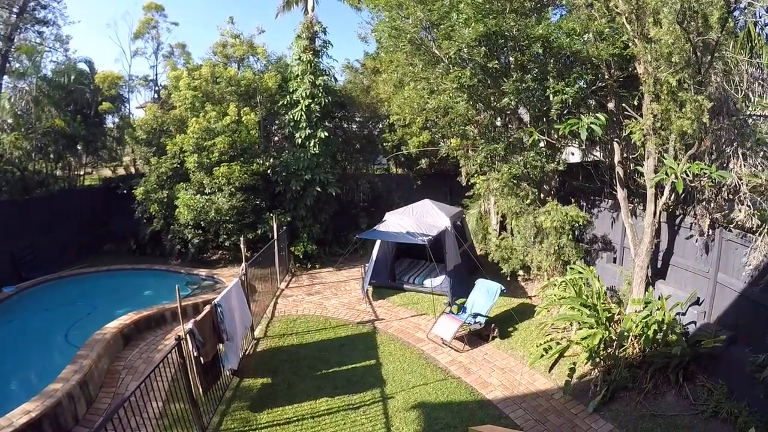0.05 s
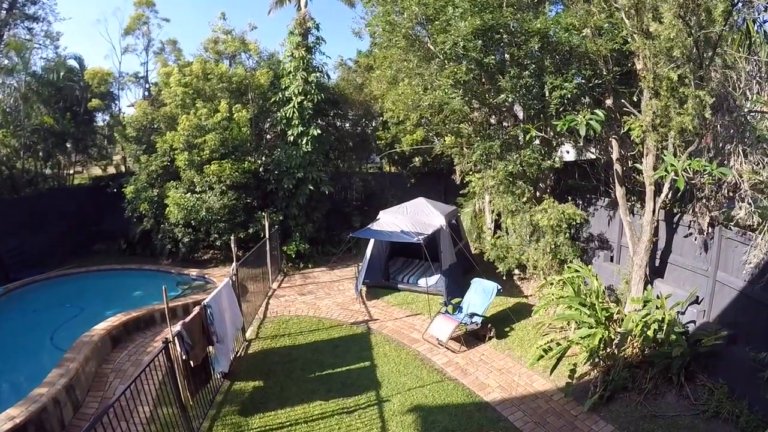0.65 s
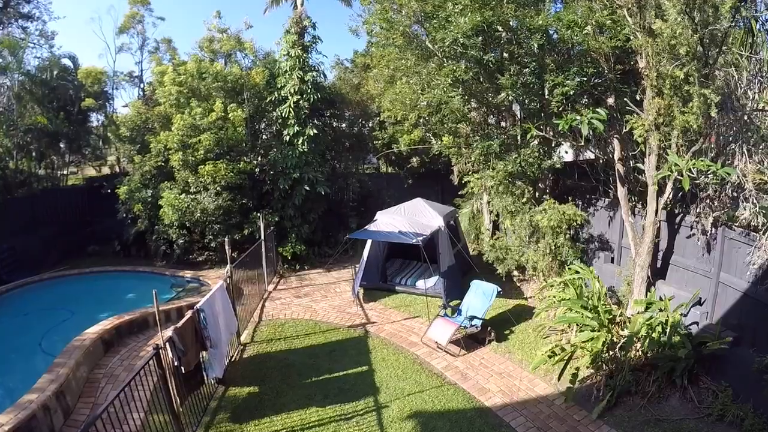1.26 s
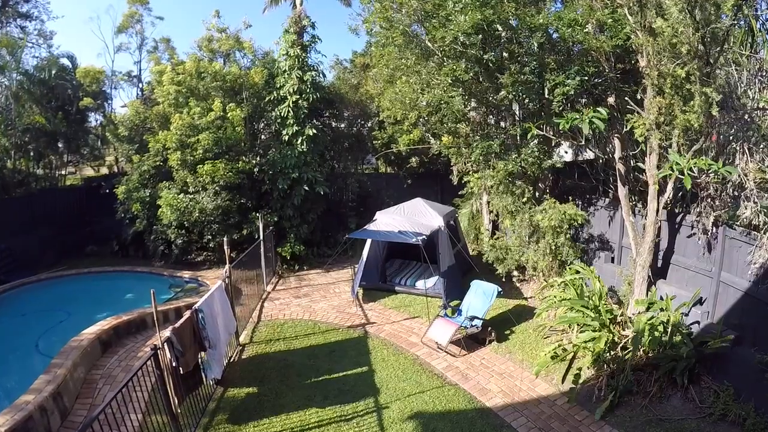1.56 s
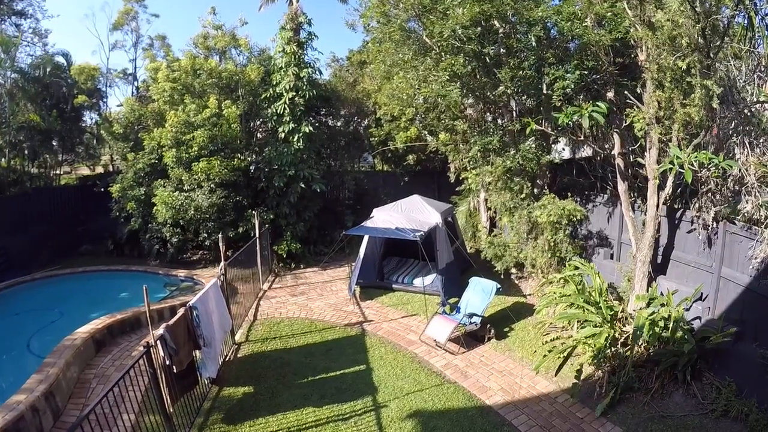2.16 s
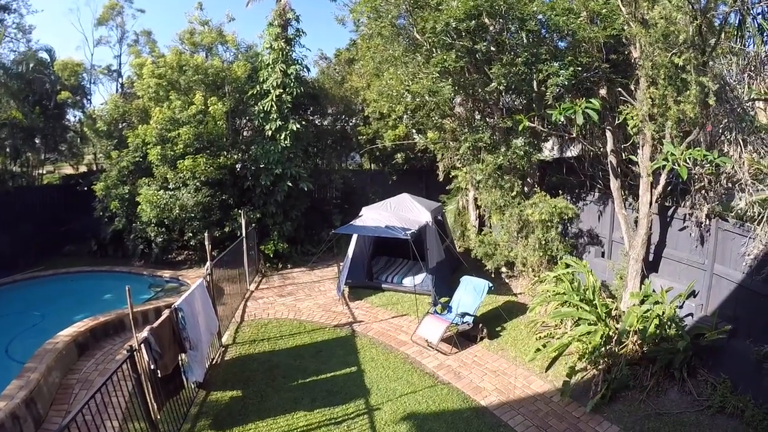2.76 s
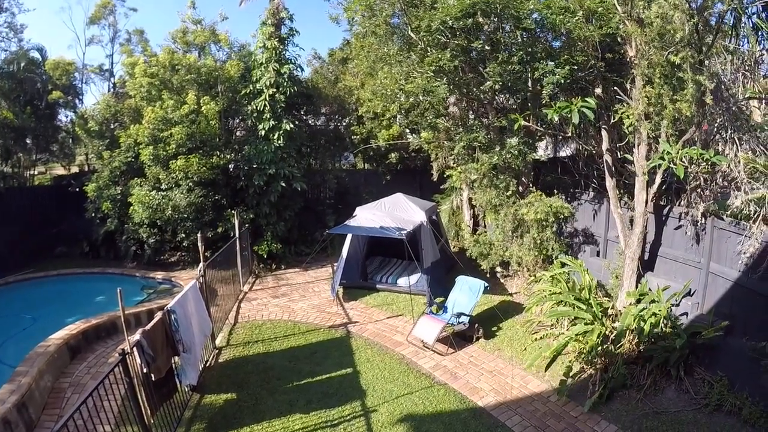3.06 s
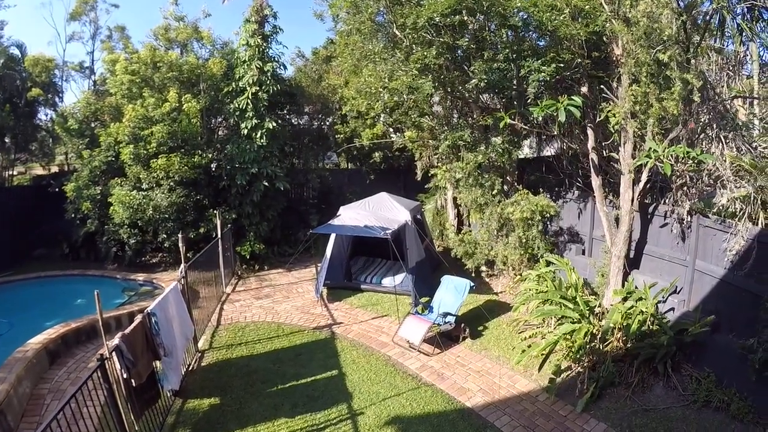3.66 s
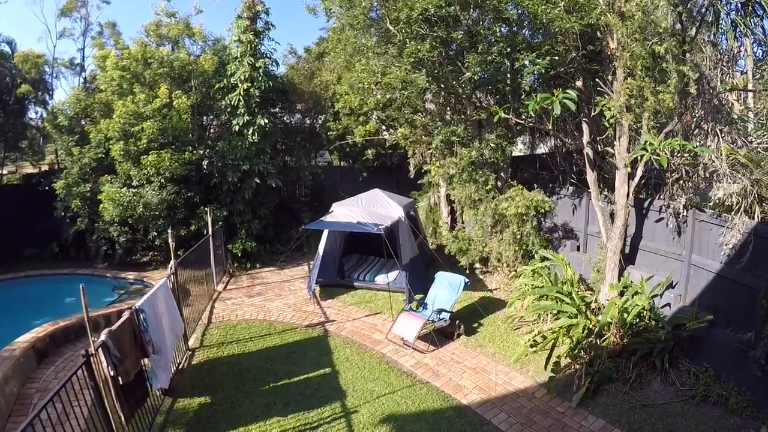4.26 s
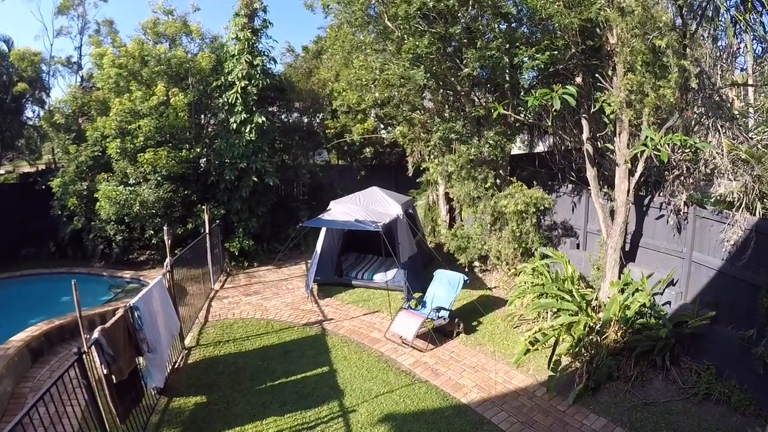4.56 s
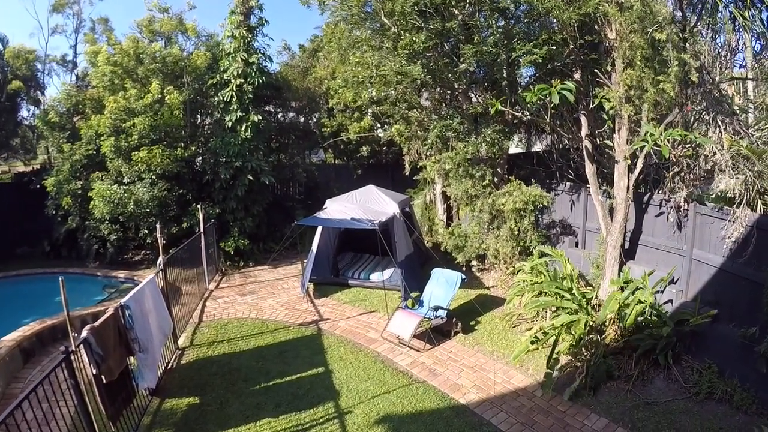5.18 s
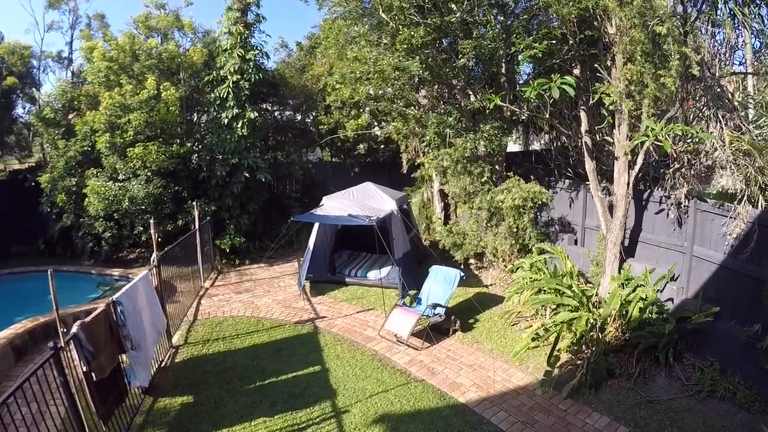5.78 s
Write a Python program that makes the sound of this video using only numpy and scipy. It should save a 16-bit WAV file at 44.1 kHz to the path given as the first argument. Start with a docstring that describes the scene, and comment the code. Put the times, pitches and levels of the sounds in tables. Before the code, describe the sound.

A small bird repeats short rising chirps in a garden while wind gusts thump the microphone over rustling leaves and a low hum.

```python
"""A bird in a breezy garden

A small bird repeats a short rising chirp that echoes off fence and house; far birds whistle faintly.
Gusts of wind thump the hand-held microphone, and fingers brush its case. Behind it all, leaves hiss,
distant traffic roars, an engine drones and a pool pump hums."""
import sys
import numpy as np
from scipy import signal
from scipy.fft import rfft, irfft
from scipy.io import wavfile
from scipy.ndimage import uniform_filter1d

SR = 44100
rng = np.random.default_rng(int(sys.argv[2]) if len(sys.argv) > 2 else 0)


def int16_out(signal):
    """Quantize to a 16-bit WAV file."""
    q = np.round(np.clip(np.atleast_2d(signal).T, -1, 1) * 32767)
    wavfile.write(sys.argv[1], SR, q.astype(np.int16))


N = 256662
T = np.arange(N) / SR

# one row a chirp (time of the top [s], top pitch [Hz], level [dB], overtone boost [dB])
CHIRP_NOTES = [(1.076, 2840, -52.5, -3), (2.943, 2980, -50, 1), (3.856, 2880, -51.5, -0.5),
               (4.404, 3026, -48.5, 1), (5.1, 3046, -47, 4), (5.724, 3070, -46, 1.5)]
# what the throat and beak let through (frequency [Hz], level [dB])
BEAK_TONE = [(2000, 2.5), (2700, -4), (3100, 4), (4200, -11), (4800, -1.5), (5500, -1.5), (6100, 0.5),
             (6700, -16), (8100, -14), (9000, -31), (14000, -37)]


def chirps(rise_s=0.039, droop_s=0.0077, fade_s=0.015, onset_db=-14.5, jitter=0.013):
    """A whistle sweeps up as it swells, then droops as it fades; the beak colours its overtones."""
    out = np.zeros(N)
    t = np.arange(-rise_s, droop_s, 1 / SR)  # 0 is the top of the sweep
    before, after = np.maximum(-t, 0), np.maximum(t, 0)
    sweep = 2 ** (-14 * before - 11 * after)  # 14 octaves a second up, 11 down
    swell = gain_of(onset_db * (before / rise_s) ** 2)
    swell *= np.minimum((droop_s - t) / fade_s, 1) * signal.windows.tukey(len(t), .1)
    for start, top_hz, db, bright_db in CHIRP_NOTES:
        waver = evened(uniform_filter1d(rng.standard_normal(SR // 4), 90))[:len(t)]
        hz = top_hz * sweep * (1 + jitter * waver)
        phase = phase_of(hz)
        voice = sum(gain_of(read(BEAK_TONE, k * hz) + bright_db * (k > 1)) * np.sin(k * phase)
                    for k in range(1, 6))
        add(out, start - rise_s, gain_of(db) * swell * voice)
    return out


# far birds' calls (time [s], length [s], start pitch [Hz], end pitch [Hz], level [dB])
FAR_CALLS = [(0.966, 0.06, 1960, 1926, -61.5), (1.231, 0.069, 1230, 1290, -59),
             (3.393, 0.17, 4780, 4790, -64.5), (3.44, 0.12, 2415, 2370, -65.5),
             (3.57, 0.11, 4500, 4045, -65), (3.619, 0.107, 2026, 1790, -63),
             (4.15, 0.077, 2096, 2285, -58.5), (4.191, 0.096, 2884, 2950, -62)]


def far_birds(jitter=0.012):
    """Birds in far trees whistle soft, sliding notes with a shaky pitch."""
    out = np.zeros(N)
    quaver = 1 + jitter * drift(120)
    for start, length, start_hz, end_hz, db in FAR_CALLS:
        hz = np.linspace(start_hz, end_hz, int(length * SR))
        hz *= quaver[round(start * SR):][:len(hz)]
        add(out, start, gain_of(db) * np.sin(phase_of(hz)) * signal.windows.tukey(len(hz), .5))
    return out


# echoes off the fence and house (delay [s], level [dB])
WALL_ECHOES = [(0.013, -22), (0.027, -10)]


def garden(sound, foliage_db, tail_db):
    """A call arrives directly, then blurred by leaves, bounced off walls and as a fading tail."""
    response = gain_of(foliage_db) * scatter(fade_s=0.067) + gain_of(tail_db) * scatter(fade_s=0.56)
    response[0] += 1  # the direct sound
    for delay, db in WALL_ECHOES:
        response[round(delay * SR)] += gain_of(db)
    return signal.oaconvolve(sound, response)[:N]


def scatter(fade_s, echoes_per_s=5000):
    """Many tiny random echoes that die away by 60 dB in fade_s."""
    t = np.arange(SR // 2) / SR
    echoes = rng.choice([-1., 1.], len(t)) * (rng.random(len(t)) < echoes_per_s / SR)
    tail = echoes * gain_of(-60 * t / fade_s) * (1 - np.exp(-t / 0.0012))
    return tail / np.linalg.norm(tail)


# the rumble of breeze and gusts (frequency [Hz], level [dB])
WIND_TONE = [(12, -1), (28, 3.5), (55, 0), (90, -8), (130, -19), (200, -31), (300, -41.5), (500, -49.5),
             (1000, -95)]
# gusts at the microphone (start [s], length [s], level [dB])
WIND_GUSTS = [(0.488, 0.086, -23), (0.603, 0.13, -26), (0.747, 0.098, -21), (0.843, 0.21, -18),
              (1.763, 0.034, -32), (2.035, 0.031, -28), (2.078, 0.2, -19.5), (2.341, 0.14, -19),
              (2.498, 0.16, -20), (2.823, 0.059, -27.5), (2.959, 0.046, -25), (3.278, 0.04, -22),
              (3.437, 0.066, -22), (3.593, 0.045, -27.5), (3.714, 0.066, -24), (4.01, 0.04, -23.5),
              (4.101, 0.037, -24.5)]


def wind(breeze_db=-38.5, gust_db=-1.7):
    """Swirling air rumbles on the microphone: a light breeze with gusts on top."""
    swirl = shaped_noise(WIND_TONE)
    swirl /= np.sqrt(uniform_filter1d(swirl ** 2, 4000))  # even out the noise's own swells
    breeze = gain_of(breeze_db) * held(start=0.73, end=4.17, fade=0.12)
    gusts = [gain_of(db + gust_db) * gust(start, length) for start, length, db in WIND_GUSTS]
    return np.hypot(breeze, np.max(gusts, axis=0)) * swirl


def gust(start, length, spread=1.155, wake_db=-6.5, wake_s=0.075):
    """One gust's strength: it swells and dies in an arch, leaving weaker swirls in its wake."""
    t = T - start - length / 2
    arch = np.exp(-(2 * t / (length * spread)) ** 2)
    wake = gain_of(wake_db) * (t > 0) * np.exp(-abs(t) / wake_s)
    return np.maximum(arch, wake)


# small whirls of air in the strongest gusts (time [s], peak level [dB], half width [s])
EDDY_THUMPS = [(0.758, -12, .0024), (1.026, -17, 0.0015), (2.112, -14, 0.0025), (2.155, -6.5, 0.0027),
               (2.192, -10, .0027), (2.397, -5, .0018), (2.428, -11, .0018), (2.448, -13.5, 0.0017),
               (2.534, -11, 0.002), (2.602, -8, 0.0017), (3.452, -7.5, 0.0024), (3.465, -10, 0.0022)]


def eddies(rebound_hz=26):
    """Each whirl thumps: a smooth push of air from which the microphone's opening rebounds."""
    bumps = sum(gain_of(db) / (1 + ((T - time) / width) ** 2) for time, db, width in EDDY_THUMPS)
    opening = signal.butter(2, rebound_hz, "highpass", fs=SR, output="sos")
    return signal.sosfilt(opening, bumps)


# finger strokes (middle time [s], length [s], level [dB])
FINGER_STROKES = [(.57, 0.43, -69.5), (2.084, 0.1, -66), (2.22, 0.031, -63.5), (2.5, 0.25, -65.5),
                  (2.755, 0.13, -67)]
# the hiss of sliding skin (frequency [Hz], level [dB])
SKIN_TONE = [(800, -16), (2500, 10), (5000, 9.5), (8000, 2), (11000, -1), (15000, -40)]


def fingers(grain_db=3):
    """Skin slides on the case in short, grainy hisses."""
    strokes = sum(gain_of(db) * np.exp(-(2 * (T - time) / length) ** 2)
                  for time, length, db in FINGER_STROKES)
    hiss = shaped_noise(SKIN_TONE) * gain_of(grain_db * drift(150))
    return strokes * evened(hiss)


# the wash of the open air (frequency [Hz], level [dB])
AIR_TONE = [(12, -9), (22, 0.5), (42, -1), (70, -9), (100, -12.5), (130, -24), (230, -20), (280, -28.5),
            (500, -32), (1000, -32.5), (2000, -40), (4800, -45.5), (7000, -53), (15200, -62.5)]


def open_air(level_db=-39, flutter_db=0.31):
    """Leaves and far traffic blend into a soft, nearly steady wash."""
    return gain_of(level_db + flutter_db * drift(15)) * shaped_noise(AIR_TONE)


# the notes that tyres sing (pitch [Hz], width [Hz], level [dB])
TYRE_NOTES = [(1086.3, 50, 5), (1187, 53, 2.3)]
# how loud the tyres are (time [s], level [dB])
TYRE_LOUDNESS = [(0, -54.5), (1.6, -59.5), (2.3, -56.5), (4.1, -58.5), (4.65, -53.5), (5.82, -58.5)]
# the traffic's low roar (frequency [Hz], level [dB])
ROAR_TONE = [(60, -19), (130, 4.5), (190, -0.5), (280, -5), (420, -6), (540, -11), (700, -40), (1500, -61)]
# how the roar grows (time [s], level [dB])
ROAR_LOUDNESS = [(0, -85), (3, -64), (4.3, -53), (5, -52), (5.82, -51)]


def traffic(tyre_db=-4, surge_db=1.0):
    """Tyres sing in surges on a far road while a low roar slowly comes nearer."""
    tyres = evened(sum(gain_of(db) * band(hz, width) for hz, width, db in TYRE_NOTES))
    tyres *= gain_of(curve(TYRE_LOUDNESS) + tyre_db + surge_db * drift(14))
    roar = gain_of(curve(ROAR_LOUDNESS)) * shaped_noise(ROAR_TONE)
    return tyres + roar


# the pump motor's notes (pitch [Hz], level [dB], width of the pitch wander [Hz])
PUMP_NOTES = [(49.1, -48.5, 4.63), (237.4, -58.5, 6), (733, -74, 4.9), (950, -72.5, 2.1), (1042, -75.5, 5),
              (1643, -74, 8.6)]


def pool_pump(waver_db=2):
    """A motor hums several notes, each wandering a little in pitch and level."""
    out = np.zeros(N)
    for hz, db, width in PUMP_NOTES:
        phase = phase_of(hz + width / 2 * drift(7.3))
        out += np.sqrt(2) * gain_of(db + waver_db * drift(5.4)) * np.sin(phase)
    return out


# how loud the distant engine is (time [s], level [dB])
ENGINE_LOUDNESS = [(0, -49), (1.3, -45), (1.8, -57), (3.9, -52), (4.4, -47), (4.8, -61)]


def engine(pitch_hz=93.5, wander_hz=0.97):
    """A distant engine drones on one low, slightly unsteady note that comes and goes."""
    phase = phase_of(pitch_hz + wander_hz * drift(4.3))
    return np.sqrt(2) * gain_of(curve(ENGINE_LOUDNESS)) * np.sin(phase)


def gain_of(db):
    """Turns decibels into a number to multiply by."""
    return 10 ** (np.asarray(db) / 20)


def evened(x):
    """Scales a signal to an average strength (rms) of 1."""
    return x / np.sqrt(np.mean(x ** 2) + 1e-30)


def phase_of(hz):
    """Adds up a changing pitch into the angle of a sine wave."""
    return 2 * np.pi * np.cumsum(hz) / SR


def read(tone, hz):
    """Looks up a tone table's level at hz, joining its rows on a log-frequency scale."""
    frequencies, levels = np.transpose(tone)
    return np.interp(np.log(hz + 1), np.log(frequencies + 1), levels)


def curve(rows):
    """Joins (time, value) rows with straight lines."""
    return np.interp(T, *np.transpose(rows))


def held(start, end, fade):
    """Fades in before start, holds at 1 and fades out after end (all in seconds)."""
    return np.clip(1 + np.minimum(T - start, end - T) / fade, 0, 1)


def add(mix, start_s, sound):
    """Mixes a sound in at start_s."""
    part = mix[max(round(start_s * SR), 0):][:len(sound)]
    part += sound[:len(part)]


def noise(shape):
    """Noise of strength 1; shape(Hz) says how much of each frequency it holds."""
    spectrum = rfft(rng.standard_normal(N)) * shape(np.fft.rfftfreq(N, 1 / SR))
    return evened(irfft(spectrum, N))


def shaped_noise(tone):
    """Noise coloured by a tone table."""
    return noise(lambda f: gain_of(read(tone, f)))


def band(hz, width):
    """Noise gathered closely round one pitch."""
    return noise(lambda f: 1 / (1 + (2 * (f - hz) / width) ** 2))


def drift(rate):
    """A random wobble, up to about rate changes a second."""
    return noise(lambda f: np.exp(-(f / rate) ** 2) * (f > 0))


def scene(birds_db=-5.5):
    """Everything that reaches the one microphone."""
    near = garden(chirps(), foliage_db=2.5, tail_db=4.0)
    far = garden(far_birds(), foliage_db=-0.5, tail_db=5.5)
    birds = gain_of(birds_db) * (near + far)
    background = open_air() + traffic() + pool_pump() + engine()
    return (birds + wind() + eddies() + fingers() + background)[None]


def record(dry, cutoff_hz=15280):
    """Cuts away the very highest treble."""
    lowpass = signal.firwin(1023, cutoff_hz, window=("kaiser", 9), fs=SR)
    return signal.oaconvolve(dry, lowpass[None], "same")


dry = scene()
out = record(dry)
int16_out(out)
```